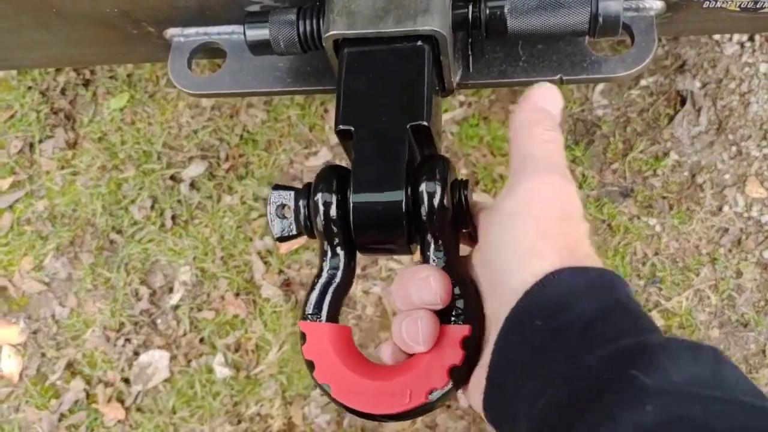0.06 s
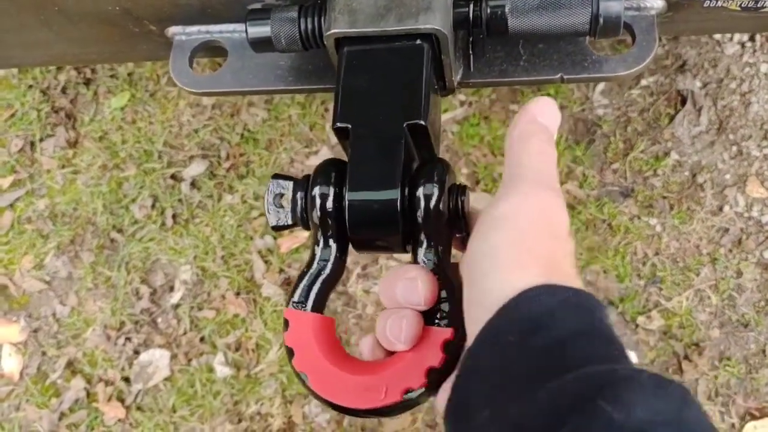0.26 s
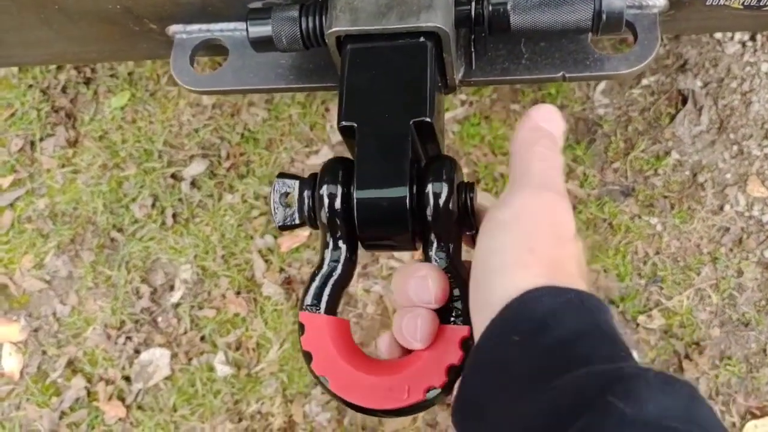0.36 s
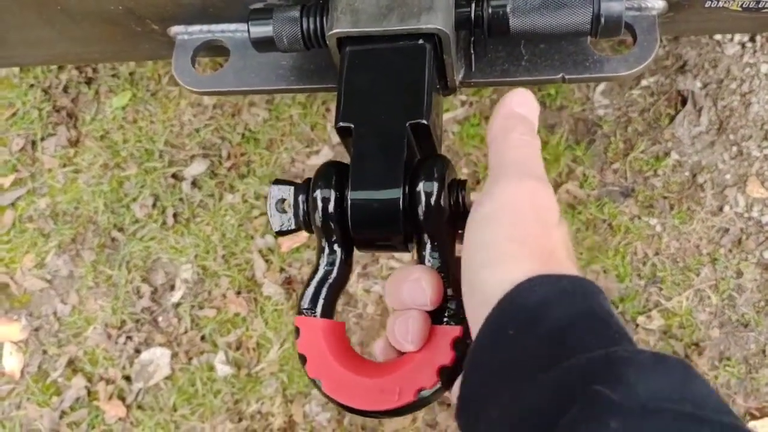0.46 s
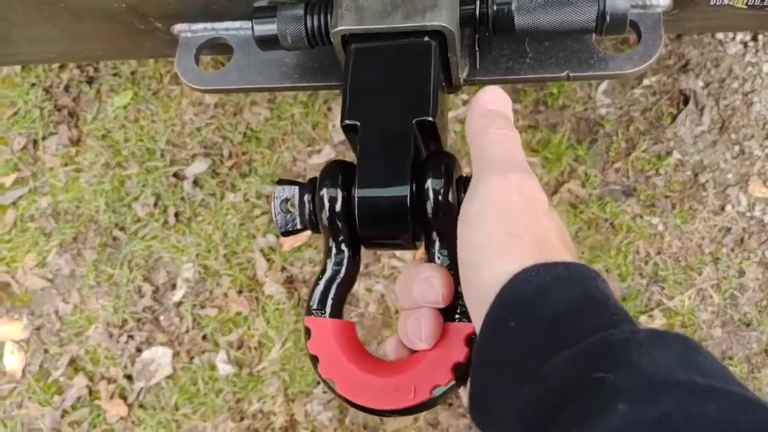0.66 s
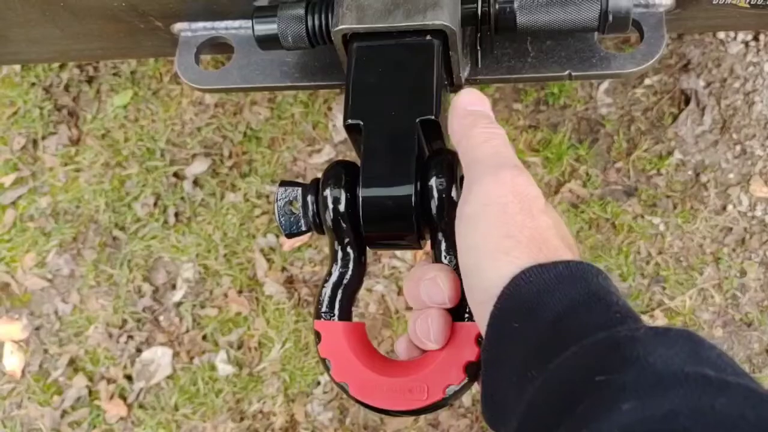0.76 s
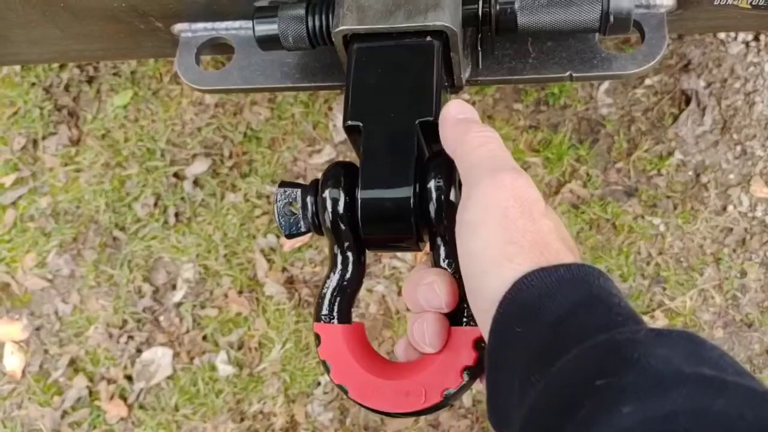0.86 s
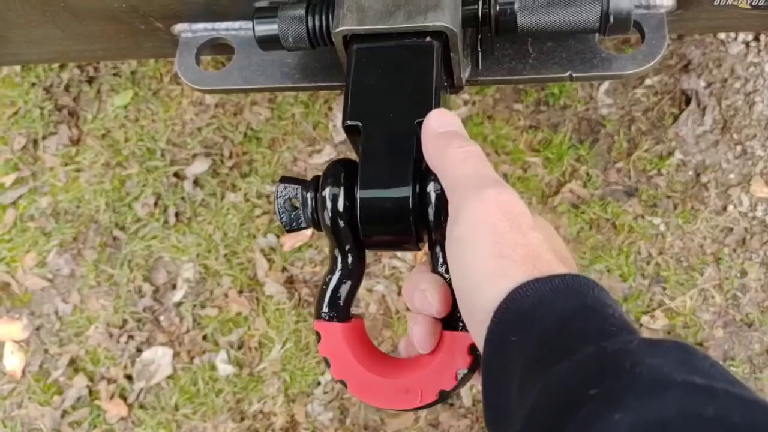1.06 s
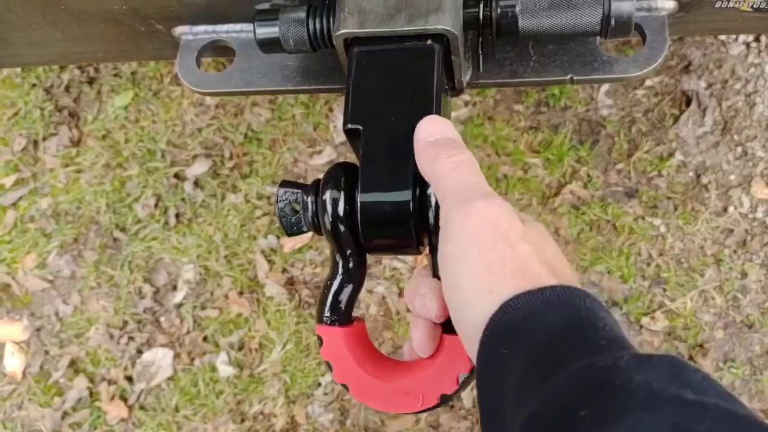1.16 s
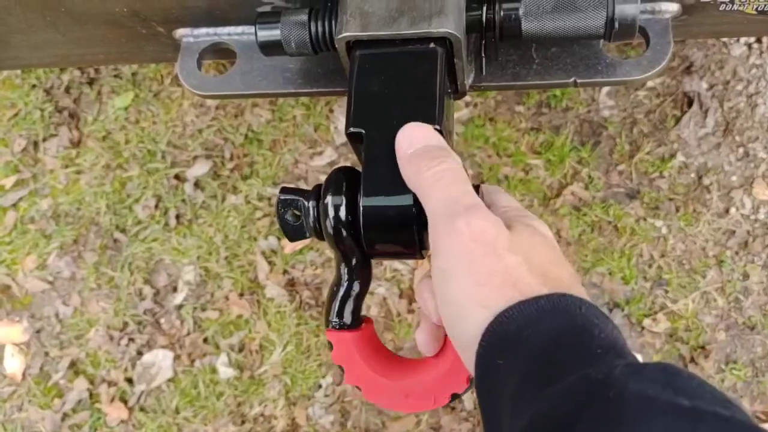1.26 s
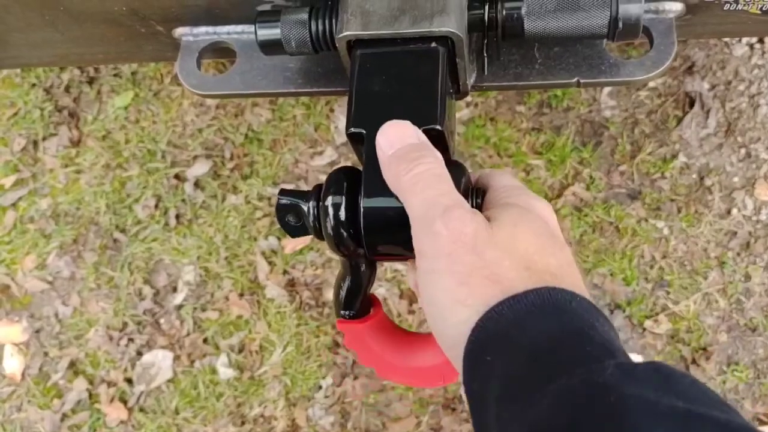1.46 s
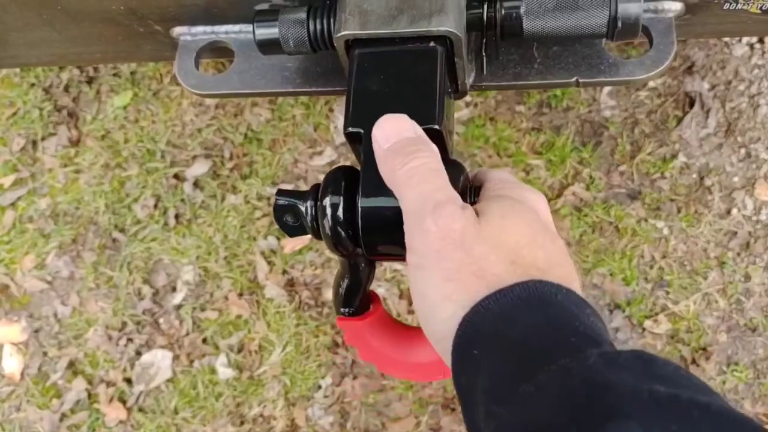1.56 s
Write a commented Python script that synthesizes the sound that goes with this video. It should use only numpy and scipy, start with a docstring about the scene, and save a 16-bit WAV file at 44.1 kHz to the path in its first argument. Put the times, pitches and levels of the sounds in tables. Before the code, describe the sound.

Close metal clunks and rattling from a tow shackle mount wiggled in its socket outdoors.

```python
"""A hand rocks a steel shackle block in the hitch receiver of a bumper, close by, in faint outdoor air.
After a soft pat, the shank knocks in its socket from 0.1 to 0.8 s, each impact setting the steel ringing.
Between knocks it drags, and stick-slip friction makes the bumper rumble; small parts tick. The rumble
dies by 1 s, a distant bird chirps twice, and a last pat and tick come near 1.3 s."""
import sys
import numpy as np
from scipy import signal
from scipy.fft import rfft, irfft
from scipy.io import wavfile
from scipy.ndimage import uniform_filter1d

SR = 44100
rng = np.random.default_rng(int(sys.argv[2]) if len(sys.argv) > 2 else 0)


def to_wav(s):
    """Save 16-bit WAV."""
    ch = np.atleast_2d(s).T  # columns
    pcm = np.round(np.clip(ch, -1, 1) * 32767)  # PCM
    wavfile.write(sys.argv[1], SR, pcm.astype(np.int16))


N = 70560

# outdoor background (frequency [Hz], relative density [dB])
AIR_SPECTRUM = [(25, -17.5), (69, 3), (144, -2), (289, -10.5), (389, -22), (826, -19.5), (2230, -30),
                (15500, -44)]
# balance of the background (frequency [Hz], left minus right [dB])
AIR_BALANCE = [(80, 19), (650, -3), (15000, -1)]
# balance of the hardware (frequency [Hz], left minus right [dB])
NEAR_BALANCE = [(350, 0.4), (700, -7), (1300, -2), (2400, -4), (4200, -0.5), (6000, -8)]
# likeness of left and right (frequency [Hz], coherence [-1 to 1])
COHERENCE = [(300, 0.75), (650, 0.32), (1400, -0.033), (3000, -0.15)]
# bird chirps (time [s], length [s], start pitch [Hz], end pitch [Hz], level [dB])
BIRD_CHIRPS = [(1.118, 0.0309, 6470, 7540, -73), (1.201, 0.0333, 6090, 7880, -73.5)]
# pin and shackle contacts
# (time [s], level [dB], centre [Hz], width [octaves], t60 [s], left minus right [dB])
PIN_TICKS = [(0.130, -72, 7000, 3.6, 0.21, -5), (0.166, -58.5, 2100, 0.68, 0.024, -7),
             (0.200, -53.5, 2100, 0.44, 0.015, -8), (0.372, -62, 13500, 0.95, 0.013, -13),
             (0.455, -57.5, 14500, 0.085, 0.04, -30.5), (0.456, -61.5, 7500, .6, 0.066, -20),
             (0.531, -62.5, 4200, 1.7, 0.014, -7), (0.673, -59, 3300, 0.4, .03, -9),
             (1.001, -54.5, 1350, 0.45, 0.0071, 17), (1.280, -59, 1300, 0.45, .008, 8)]
# the shank dragging in its socket (time [s], boom level [dB], groan level [dB])
DRAG_LEVELS = [(0, -64, -90), (0.164, -63.5, -57.5), (0.176, -57.5, -48), (0.248, -39, -39.5),
               (0.293, -45, -56), (0.331, -55, -56.5), (0.354, -52, -47), (0.449, -42.5, -44),
               (.475, -32.5, -49), (0.523, -36, -39), (0.552, -47, -41), (0.596, -38.5, -37),
               (0.622, -47, -44.5), (0.792, -43.5, -48), (0.842, -56, -69.5), (1.0, -67, -69.5)]
# low boom of dragging (frequency [Hz], relative density [dB])
BOOM_SPECTRUM = [(45, -36), (75, 0), (120, -4), (160, 1.5), (200, -15.5), (1000, -66.5)]
# grit of dragging (frequency [Hz], relative density [dB])
GRIT_SPECTRUM = [(100, -50), (250, 1), (620, -3), (1100, -11), (6000, -50), (15000, -57)]
# bumper resonances (frequency [Hz], width per filter pass [Hz], relative level [dB])
BUMPER_MODES = [(227, 22, -3), (284, 36, -3), (316, 30, 0), (419, 16, -10), (488, 20, -13)]
# the bumper's thump (frequency [Hz], relative density [dB])
THUMP_SPECTRUM = [(30, -33), (65, -17.5), (122, 4.5), (200, -8.5), (305, 6), (420, -12.5), (1200, -36.5),
                  (4000, -74)]
# pats of the hand on the block (time [s], level [dB])
HAND_PATS = [(0.029, -49), (0.169, -40.5), (1.281, -55)]
# the clank of a knock (frequency [Hz], relative density [dB])
CLANK_SPECTRUM = [(250, -40.5), (480, 3), (690, 6), (1100, 3), (1550, -3.5), (2400, -14), (2800, -22.5),
                  (4300, -29), (5100, -42.5), (10000, -66)]
# modes of block and receiver (frequency [Hz], relative level [dB], t60 [s])
STEEL_MODES = [(420, -6, .27), (859, -2.3, .31), (943, -8, .27), (1168, -2, .35), (1322, -7, .14),
               (1590, -13, .21), (1976, -13.5, .19), (2262, -12.5, .19), (2422, -12.3, .21),
               (3570, -21.5, .15)]
# steel-on-steel impacts (time [s], contact gain [dB], upper hollow pitch [Hz], treble shelf [dB],
# top shelf [dB], thump level [dB], low ring gain [dB], high ring gain [dB])
SHANK_KNOCKS = [(0.119, -46.5, 1030, -20, 25, -55, -61, -68), (0.225, -37, 970, 7, 3.5, -43.5, -47, -57),
                (0.234, -31.5, 921, -17.5, 19.5, -43, -33.5, -41.5),
                (0.371, -26, 1117, 1.5, 8.5, -44, -31, -38.5), (0.449, -27, 1050, 1, 5.5, -40, -56, -42.5),
                (0.459, -22.5, 956, -5.5, 13, -46, -29, -34), (0.467, -37, 963, 8, 11, -25, -34.5, -50.5),
                (0.5588, -20.5, 1095, 4, 4.5, -32.5, -36, -31.5),
                (0.652, -39, 886, 3, -8, -43, -43.5, -50.5), (0.7595, -30, 1100, 4, -9, -37.5, -37, -45.5)]


def amp(db):
    """Amplitude grows tenfold with every 20 dB."""
    return 10 ** (np.asarray(db) / 20)


def unit(x):
    """Normalisation to an rms of 1."""
    return x / np.sqrt(np.mean(x ** 2) + 1e-20)


def read(points, hz):
    """Interpolation of a table on a log-frequency axis."""
    f, value = np.transpose(points)
    return np.interp(np.log(hz + 1), np.log(f), value)


def sides(db):
    """Constant-power panning: left and right gains for a level difference."""
    gains = amp(np.array([np.atleast_1d(db) / 2, -np.atleast_1d(db) / 2]))
    return gains / np.sqrt(np.mean(gains ** 2, 0))


def add(mix, start_s, sound):
    """Superposition: a sound adds to the mix from its start time."""
    part = mix[:, max(round(start_s * SR), 0):][:, :sound.shape[1]]
    part += sound[:, :part.shape[1]]


def fade(t, t60):
    """Exponential decay from t = 0, by 60 dB in t60."""
    return np.exp(-np.log(1000) * np.maximum(t, 0) / t60)


def wash(spectrum, balance, size):
    """Partials of random phase sum to coloured noise, partly coherent between left and right."""
    hz = np.fft.rfftfreq(size, 1 / SR)
    left, independent = np.exp(2j * np.pi * rng.random((2, len(hz))))
    coherence = np.clip(read(COHERENCE, hz), -1, 1)
    right = coherence * left + np.sqrt(1 - coherence ** 2) * independent
    return unit(irfft(np.array([left, right]) * amp(read(spectrum, hz)) * sides(read(balance, hz)), size))


def burst(spectrum, envelope):
    """Amplitude modulation: noise takes the shape and energy of an envelope."""
    return unit(wash(spectrum, NEAR_BALANCE, len(envelope)) * envelope) * np.sqrt(np.mean(envelope ** 2))


def steady(x):
    """Division by the running rms evens out the slow swells of noise."""
    power = np.mean(np.atleast_2d(x) ** 2, 0)
    return x / np.sqrt(uniform_filter1d(uniform_filter1d(power, size=1400), size=700) + 1e-6)


def ears(hz):
    """Interaural level and phase differences of one mode, as two complex gains."""
    spread = np.arccos(np.clip(read(COHERENCE, hz), -1, 1)) * rng.choice([-1, 1])
    phase = 2 * np.pi * rng.random() + np.array([[0], [spread]])
    return sides(read(NEAR_BALANCE, hz)) * np.exp(1j * phase)


def air(level_db=-61):
    """Stationary outdoor noise, strongest in the bass."""
    return amp(level_db) * wash(AIR_SPECTRUM, AIR_BALANCE, N)


def bird(waver_hz=340, pan_db=-7, echo_db=-11 + 14):
    """Frequency modulation makes thin, wavering upward sweeps; reverberation from trees blurs them."""
    out = np.zeros((2, N))
    for s, length, from_hz, to_hz, db in BIRD_CHIRPS:
        progress = np.linspace(0, 1, round(length * SR))
        waver = unit(uniform_filter1d(rng.standard_normal(N), size=60))[:len(progress)]
        hz = from_hz + (to_hz - from_hz) * np.sqrt(progress) + waver_hz * waver
        envelope = np.sqrt(abs(np.sin(np.pi * progress)))
        add(out, s, amp(db) * sides(pan_db) * envelope * np.sin(2 * np.pi * np.cumsum(hz) / SR))
    echo = rng.standard_normal((2, SR // 2)) * fade(np.arange(SR // 2) / SR, t60=.27)
    echo /= np.linalg.norm(echo[0])
    return out + amp(echo_db) * signal.fftconvolve(out, echo, axes=1)[:, :N]


def ticks(snap_db=3):
    """Impulse response of a small part: a spike and a brief scatter in the same frequency band."""
    out, t = np.zeros((2, N)), np.arange(SR // 5) / SR - .1
    hz = np.fft.rfftfreq(len(t), 1 / SR) + 1
    for s, db, centre_hz, octaves, t60, pan_db in PIN_TICKS:
        colour = np.exp(-.5 * (np.log2(hz / centre_hz) / octaves) ** 2)
        spike = np.fft.fftshift(irfft(colour, len(t)))
        tail = rng.standard_normal((2, len(t))) * (t > 0) * fade(t, t60)
        scatter = irfft(rfft(tail) * unit(colour), len(t))
        add(out, s + t[0], amp(db) * sides(pan_db) * (amp(snap_db) * spike / spike.max() + scatter))
    return out


def drag(slips_per_s=900, grit_db=-2.5):
    """Stick-slip friction: tiny slips of the shank drive the bumper's resonances, over boom and grit."""
    s, boom_db, groan_db = np.transpose(DRAG_LEVELS)
    t = np.arange(N) / SR
    slips = rng.standard_normal(N) * (rng.random(N) < slips_per_s / SR)
    groan = np.zeros(N)
    for hz, width, db in BUMPER_MODES:
        b, a = signal.iirpeak(hz, hz / width, fs=SR)
        groan += amp(db) * unit(signal.lfilter(b, a, signal.lfilter(b, a, slips)))
    groan = steady(groan) + amp(grit_db) * wash(GRIT_SPECTRUM, NEAR_BALANCE, N)
    boom = steady(wash(BOOM_SPECTRUM, NEAR_BALANCE, N))
    return amp(np.interp(t, s, groan_db)) * groan + amp(np.interp(t, s, boom_db)) * boom


def thump(t, rise_s=.0035):
    """Transient response: the bumper answers a blow with a dull, damped burst."""
    return burst(THUMP_SPECTRUM, np.minimum(t / rise_s, 1) * fade(t - rise_s, t60=.11))


def pats():
    """Soft contact excites mainly low frequencies, so the hand only thumps."""
    out, t = np.zeros((2, N)), np.arange(SR // 2) / SR
    for s, db in HAND_PATS:
        add(out, s, amp(db) * thump(t))
    return out


def hollow(t, hz, sag_s, peak_s):
    """Heavily damped oscillation: a note of the socket swells, sinks in pitch and is gone."""
    cycles = hz * sag_s * (1 - np.exp(-t / sag_s))
    envelope = (t / peak_s * np.exp(1 - t / peak_s)) ** 2
    return (ears(hz) * np.exp(2j * np.pi * cycles)).real * envelope


def after_ring(crowd_hz, t):
    """Modal superposition: a crowd of weaker modes shares one decay rate."""
    spectrum = np.zeros((2, len(t) // 2 + 1), complex)
    phasors = np.exp(2j * np.pi * rng.random((2, len(crowd_hz))))
    bins = np.round(crowd_hz * len(t) / SR).astype(int)
    spectrum[:, bins] = phasors * amp(read(CLANK_SPECTRUM, crowd_hz))
    spectrum[:, bins] *= sides(read(NEAR_BALANCE, crowd_hz))
    return unit(irfft(spectrum, len(t))) * fade(t, t60=.19)


def ring(t, low_db, high_db, split_hz=1000, swell_s=.009, scatter_db=1.5):
    """Free vibration of the steel: each mode decays at its own rate; low modes build up more slowly."""
    out = np.zeros((2, len(t)))
    for hz, db, t60 in STEEL_MODES:
        level = amp(db + (low_db if hz < split_hz else high_db) + scatter_db * rng.standard_normal())
        swell = 1 - np.exp(-t / swell_s * (hz / split_hz) ** 2)
        out += level * (ears(hz) * np.exp(2j * np.pi * hz * t)).real * swell * fade(t, t60)
    return out


def harden(x, treble_db, top_db, treble_hz=1240, top_hz=2760):
    """Contact stiffness, as two shelf filters: a harder contact excites more treble."""
    hz = np.fft.rfftfreq(x.shape[1], 1 / SR)
    shelf = lambda corner: 1 - 1 / (1 + (hz / corner) ** 8)
    return irfft(rfft(x) * amp(treble_db * shelf(treble_hz) + top_db * shelf(top_hz)), x.shape[1])


def knocks(rise_s=.0007, hold_s=.007, crowd_low_hz=544, crowd_high_hz=6275):
    """Impact excitation: each knock gives a clank, two hollow notes, ringing modes and a thump."""
    out, t = np.zeros((2, N)), np.arange(SR // 2) / SR
    steps = np.cumsum(rng.uniform(0.46, 2.2, size=70))
    crowd_hz = crowd_low_hz + (crowd_high_hz - crowd_low_hz) * steps / steps[-1]
    attack, release = np.minimum(t / rise_s, 1), np.minimum(t[::-1] * 10, 1)
    for s, db, upper_hz, treble_db, top_db, thump_db, low_ring_db, high_ring_db in SHANK_KNOCKS:
        clank = amp(-10.8) * burst(CLANK_SPECTRUM, fade(t - hold_s, t60=.068))
        lower = amp(-1.2) * hollow(t, hz=850, sag_s=.048, peak_s=.007)
        upper = amp(-2.5) * hollow(t, upper_hz, sag_s=.6, peak_s=.004)
        contact = clank + lower + upper + amp(-11) * after_ring(crowd_hz, t)
        steel = amp(db) * contact + ring(t, low_ring_db, high_ring_db)
        steel = harden(steel * attack, treble_db, top_db)
        add(out, s, steel * release + amp(thump_db) * thump(t))
    cluck = amp(-39) * hollow(t, hz=654, sag_s=.3, peak_s=.015)  # the shank settles
    add(out, start_s=.61, sound=cluck)
    return out


def scene():
    """Sound pressures add: the hardware in front, bird and outdoor air behind."""
    return knocks() + pats() + drag() + ticks() + bird() + air()


def record(dry, low_cut_hz=48, edge_hz=15750):
    """Band limiting: the microphone's low cut, then a steep low-pass filter."""
    dry = signal.sosfilt(signal.butter(2, low_cut_hz, "highpass", fs=SR, output="sos"), dry)
    low_pass = signal.firwin(511, edge_hz, window=("kaiser", 9), fs=SR)
    return signal.oaconvolve(dry, low_pass[None], "same")


dry = scene()
out = record(dry)
to_wav(out)
```